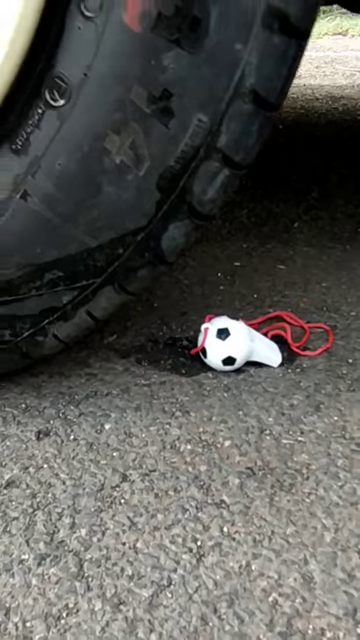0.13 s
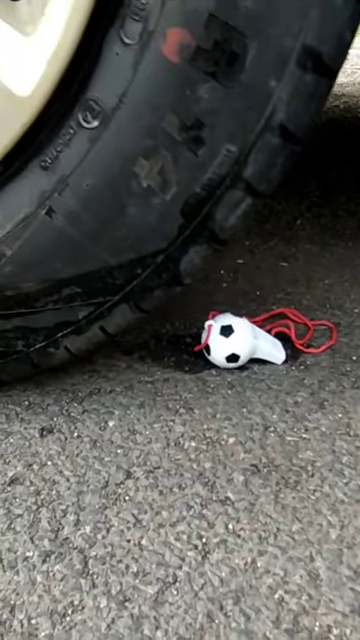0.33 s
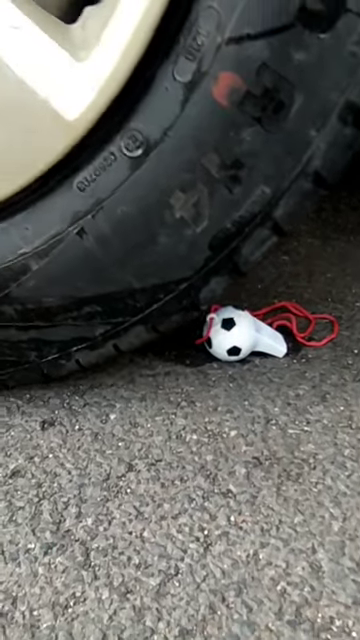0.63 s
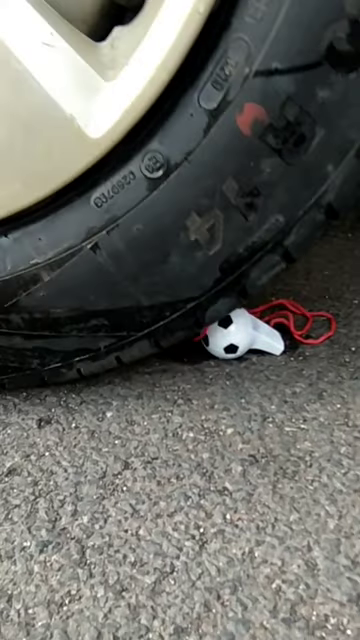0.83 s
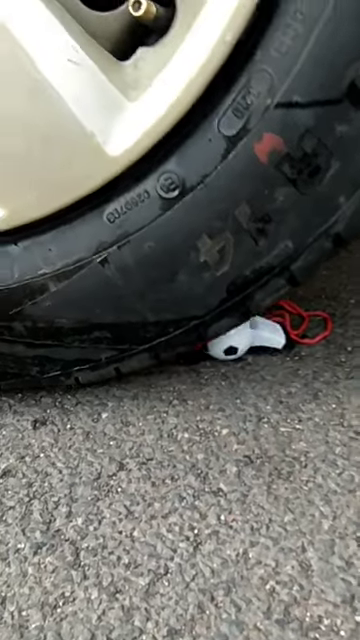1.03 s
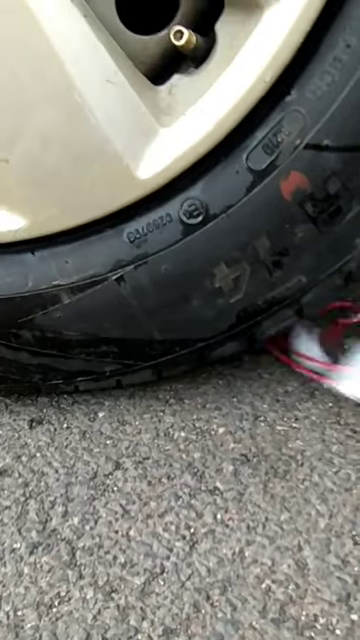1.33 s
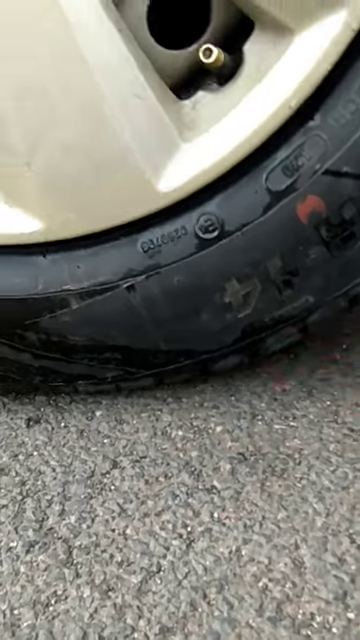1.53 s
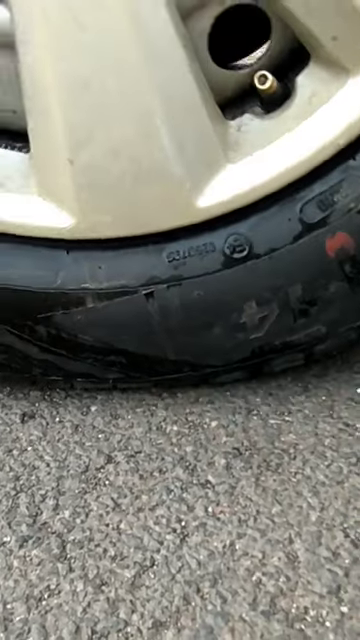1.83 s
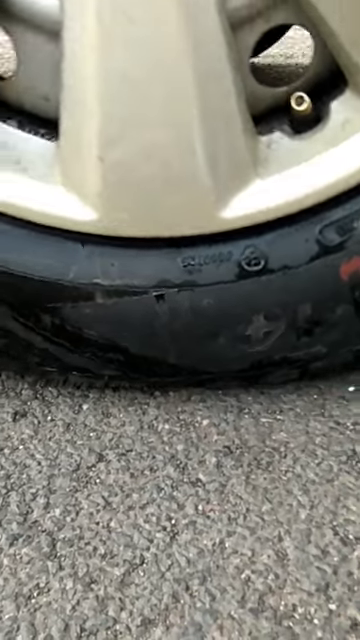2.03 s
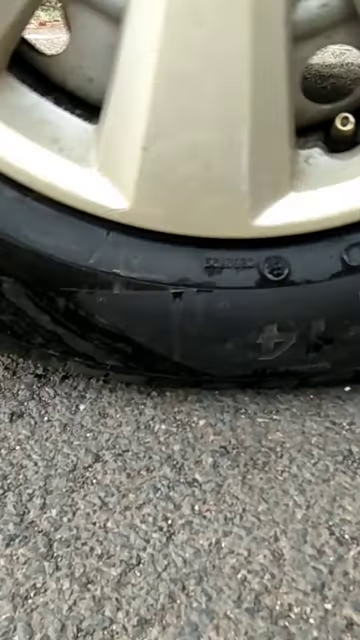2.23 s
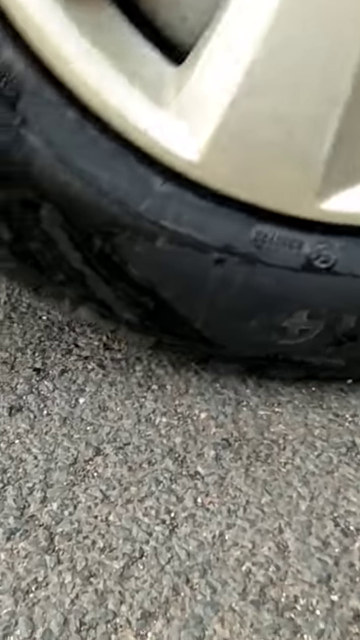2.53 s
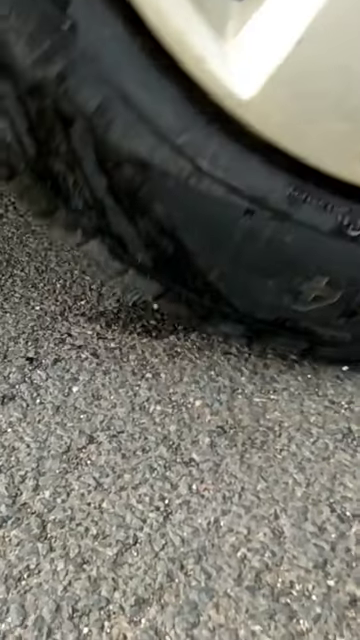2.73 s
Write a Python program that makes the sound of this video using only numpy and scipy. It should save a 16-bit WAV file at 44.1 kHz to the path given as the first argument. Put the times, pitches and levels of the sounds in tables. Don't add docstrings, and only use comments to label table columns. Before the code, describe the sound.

A hollow plastic toy cracks and splinters under a slow car tyre, engine idling beneath

```python
import sys
import numpy as np
from scipy import signal
from scipy.fft import rfft, irfft
from scipy.io import wavfile
from scipy.ndimage import uniform_filter1d, map_coordinates

SR = 44100
rng = np.random.default_rng(int(sys.argv[2]) if len(sys.argv) > 2 else 0)


def store_pcm(level_fs):
    pcm = np.round(np.clip(level_fs, -1, 1) * 32767).astype(np.int16)
    wavfile.write(sys.argv[1], SR, np.atleast_2d(pcm).T)


def rack_gain(trim_db):
    fader = np.asarray(trim_db, float)
    return 10 ** (fader / 20)


N = 127890
T = np.arange(N) / SR
BAND_HZ = 260 * 2 ** np.arange(0, 5.9, .2)

# (time [s], level [dB], frequency [Hz])
COLLAPSES = [
    (1.136, -18, 18),
    (1.241, -19.5, 7.6),
    (1.429, -17, 10.04),
]
# (time [s], level [dB], lag of left port [samples])
TYRE = [(0, -33, -10.5), (.2, -33, -12), (.4, -32, -6), (.6, -29.5, -3), (.7, -27, -2), (.9, -26, -3.5),
        (1.12, -24, 7), (1.35, -29, -4), (1.6, -29, 14), (1.9, -32, 13.5), (2.2, -36, 15.5),
        (2.5, -36.5, 15.5), (2.9, -37, 13)]


def level(x, db):
    return x * rack_gain(db) / np.sqrt(np.mean(x ** 2))


def curve(table, order):
    return np.interp(T, np.array(table)[:, 0], np.array(table)[:, order])


def colour(x, points, size=1024):
    p = np.array(points)
    log_hz = np.log(np.fft.rfftfreq(size, 1 / SR) + 1)
    log_gain = np.interp(log_hz, np.log(p[:, 0]), p[:, 1]) * np.log(10) / 20
    cepstrum = irfft(log_gain)
    cepstrum[1:size // 2] *= 2
    cepstrum[size // 2 + 1:] = 0
    h = irfft(np.exp(rfft(cepstrum)))
    return signal.fftconvolve(x, h / np.sqrt(np.sum(h ** 2)))[:len(x)]


def reso(x, hz, width_hz):
    return signal.lfilter(*signal.iirpeak(hz, hz / width_hz, SR), x)


def walk(rate):
    k = int(SR / rate)
    held = np.repeat(rng.standard_normal(N // k + 1), k)
    return 1.2 * uniform_filter1d(uniform_filter1d(held, k), k)[:N]


def grains(per_s, spread_db):
    chance, sign, size = rng.random((3, N))
    clicks = (chance < per_s / SR) * np.sign(sign - .5)
    return level(clicks * rack_gain(-spread_db * np.log(size + .04)), 0)


def smear(x, t60):
    tail = rng.standard_normal(8000) * rack_gain(-60 * T[:8000] / t60)
    return signal.fftconvolve(x, tail / np.sqrt(np.sum(tail ** 2)))[:N]


def shell():
    # (time [s], level [dB], hold [s], body boom [dB], cavity ring [dB])
    bursts = [
        (0.407, -54, 0.015, -31.5, -37),
        (1.1163, -28, 0.003, -57, -54),
        (1.1347, -15, 0.0064, -56, -50),
        (1.141, -27, 0.01, -38, -29),
        (1.224, -30.5, 0.0066, -37, -58),
        (1.2322, -15, 0.015, -33, -33.5),
        (1.247, -24, 0.043, -51, -25.5),
        (1.278, -19.5, 0.01, -31, -54),
        (1.4277, -16.5, 0.02, -26.5, -31.5),
        (1.435, -29, 0.0065, -24.5, -42),
    ]
    # (frequency [Hz], width [Hz], level [dB])
    body_modes = [(259, 170, -3.5), (690, 280, -5), (1340, 1200, -17)]
    # (frequency [Hz], level [dB per Hz])
    splinter_tone = [(200, -10), (1800, -6), (2600, -10), (3800, -11), (7200, -5), (9000, -1),
                     (12000, -18.5), (16200, -29)]
    burst_t60_s, sag_db_per_s = 0.071, 200
    snap_db, snap_s = 4, .0015
    cavity_hz, cavity_width_hz = 2460, 200
    splits = grains(1800, 4) + .6 * rng.standard_normal(N)
    push = 0
    for t0, db, hold, boom_db, ring_db in bursts:
        sag = -sag_db_per_s * np.clip(T - t0, 0, hold)
        decay = -60 * np.clip(T - t0 - hold, 0, None) / burst_t60_s
        snap = snap_db * np.exp(-np.abs(T - t0) / snap_s)
        shape = (T >= t0) * rack_gain(decay + sag + snap)
        push = push + rack_gain(np.array([[db], [boom_db], [ring_db]])) * shape * splits
    split_push, body_push, cavity_push = push
    body = sum(rack_gain(db) * reso(body_push, hz, w) * np.sqrt(SR / w) / 2 for hz, w, db in body_modes)
    cavity = reso(cavity_push, cavity_hz, cavity_width_hz) * np.sqrt(SR / cavity_width_hz) / 2
    return colour(split_push, splinter_tone) + body + cavity


def ticks():
    # (time [s], peak level [dB], frequency [Hz])
    snaps = [(1.1084, -20, 1210), (1.1089, -21, 9470), (1.1179, -19, 1770), (1.1196, -13, 10120),
             (1.1238, -20, 1810), (1.1355, -7, 9650), (1.1394, -8, 9170), (1.1414, -11, 1890),
             (1.1546, -17, 2110), (1.1587, -16, 8610), (1.168, -21, 1420), (1.2204, -18, 8570),
             (1.2344, -10, 2110), (1.2347, -5, 8570), (1.2493, -10, 2370), (1.2586, -14, 2410),
             (1.2653, -13, 9090), (1.2799, -13, 1460), (1.2799, -12, 9170), (1.2918, -17, 3010),
             (1.3477, -25, 9000), (1.3749, -21, 1850), (1.3796, -20, 1680), (1.4036, -19, 1890),
             (1.4088, -22, 9300), (1.4159, -21, 2760), (1.4302, -9, 9040), (1.431, -9, 2110),
             (1.4331, -12, 2760), (1.4346, -11, 9130), (1.4388, -13, 1680), (1.4411, -13, 1210),
             (1.4439, -13, 9220), (1.4979, -26, 10120), (1.5599, -6, 8870), (1.5787, -17, 2710),
             (1.5792, -13, 7360), (1.5813, -20, 1940), (1.5828, -11, 9350), (1.5856, -13, 7320),
             (1.5985, -22, 1640), (1.6045, -22, 1590), (1.613, -21, 8610), (1.6374, -18, 7150),
             (1.6585, -21, 1290), (1.6586, -18, 9040), (1.6959, -9, 9170), (1.6984, -19, 2540),
             (1.7125, -21, 2450), (1.725, -22, 2410), (1.7651, -6, 8790), (1.7657, -20, 2410),
             (1.8144, -15, 6160), (1.8151, -21, 2540), (1.9017, -18, 8700), (2.1896, -18, 8480)]
    trim_db, click_db, ring_cycles = -4.5, -10, 24
    out, d = np.zeros(N), T[:900]
    for (t0, db, hz), (turn, detune) in zip(snaps, rng.random((len(snaps), 2))):
        tone = np.sin(2 * np.pi * (hz * (1 + 0.047 * (detune - .5)) * d + turn / 2))
        ring = tone * rack_gain(-60 * d * hz / ring_cycles)
        click = rack_gain(click_db - 60 * d / 0.003) * rng.standard_normal(len(d))
        out[int(t0 * SR):][:len(d)] += rack_gain(db + trim_db) * (ring + click)
    return out


def shards():
    # (time [s], level [dB], crack t60
    # [s], ring frequency [Hz], ring level [dB])
    skips = [(1.242, -45, .02, 2480, -16), (1.255, -45, .02, 2440, -12), (1.237, -44, .02, 8500, -11),
             (1.139, -40, .02, 9250, -16), (1.525, -37, .03, 2580, -30), (1.5592, -17.5, 0.06, 8200, -33),
             (1.56, -34, .03, 5500, -34), (1.58, -38, 0.041, 3050, -24), (1.601, -46, .04, 4498, -34),
             (1.578, -22, 0.034, 7400, -14), (1.619, -44, 0.044, 3700, -42),
             (1.636, -28.5, 0.06, 9210, -26), (1.659, -24, 0.033, 2700, -43),
             (1.6905, -23, 0.053, 6000, -22), (1.694, -20, 0.043, 2710, -23),
             (1.6986, -42, .03, 4460, -14.5), (1.698, -45, 0.021, 6000, -32),
             (1.7641, -7.5, 0.03, 8550, -24), (1.767, -34, 0.019, 14400, -27),
             (1.814, -16, 0.021, 10580, -44.5), (1.82, -43, 0.025, 6080, -18.5),
             (1.817, -51, 0.036, 2517, -23), (1.9, -23.5, 0.033, 9105, -23.5),
             (1.946, -44, 0.031, 8860, -30), (2.178, -45, 0.027, 7400, -38),
             (2.188, -32.5, 0.069, 8970, -28)]
    # (frequency [Hz], level [dB per Hz])
    rattle_tone = [(1200, -20.5), (2500, -15), (3800, -7.5), (6200, 2), (9000, 7), (11500, -9),
                   (14000, -19), (16200, -15)]
    ring_t60_s, ring_rise_s = .036, 0.00063
    noise = rng.standard_normal(N) + 1.07 * grains(2800, 0.9)
    crack, ring = 0, 0
    for (t0, db, t60, hz, ring_db), turn in zip(skips, rng.random(len(skips))):
        d = np.clip(T - t0, 0, None)
        crack = crack + (d > 0) * rack_gain(db - 60 * d / t60)
        tone = np.sin(2 * np.pi * (hz * d + turn / 3)) * (1 - np.exp(-d / ring_rise_s))
        ring = ring + rack_gain(ring_db - 60 * d / ring_t60_s) * tone
    return colour(noise * crack, rattle_tone) + ring


def shoves():
    out = 0
    for t0, db, hz in COLLAPSES:
        cycles = np.clip(T - t0, 0, None) * hz
        out = out - rack_gain(db) * np.sin(2 * np.pi * cycles) * np.exp(-1.6 * cycles)
    return out


def engine():
    # (time [s], level [dB], firing rate [Hz])
    idle = [(0.25, -37, 25.17), (0.62, -33, 24.98), (0.67, -33, 25.63), (1.07, -26.5, 25.85),
            (1.15, -27, 26.18), (1.55, -29, 25.55), (2.0, -34, 25.71), (2.38, -36.5, 26.13),
            (2.74, -40.5, 25.93), (2.85, -38.5, 26.66)]
    # (frequency [Hz], width [Hz], level [dB])
    exhaust = [(28, 1.6, -64), (56, 8.7, -6.5), (125.2, 20, 2), (160.8, 15.2, -1), (178.9, 7.8, -0.5),
               (203.8, 4.5, -7), (228.3, 15.3, -10), (248.4, 60, -14)]
    # (frequency [Hz], width [Hz], level [dB])
    tailpipe = [(345, 80, -2), (680, 110, 0), (1050, 400, -3)]
    # (time [s], tailpipe over the boom [dB], tilt of the boom [dB per half octave])
    tail = [(0, -30, 12.5), (1.2, -33, 7.5), (1.6, -9, 7), (2.2, 0.5, 3.5), (2.9, 2.5, 3)]
    # (time [s], level over the boom [dB])
    sixth_order = [(0, -14), (1.5, -13), (1.9, -3.5), (2.35, -1), (2.9, -1)]
    jitter, scatter_db, first_turn = .006, 1.5, .3
    puff_share, puff_db, pipe_spread_s = .55, -3, .0075
    tail_puff_db, tail_scatter_db = 1, 4
    tail_nears_s, lead_s_per_s = 1.95, .019

    def ring(x, hz, width_hz, db):
        return rack_gain(db) * reso(x, hz, width_hz) / np.sqrt(width_hz)

    rate = curve(idle, order=2)
    turns = np.cumsum(rate * (1 + jitter * walk(13))) / SR + first_turn
    fired = level(np.diff(np.floor(turns), prepend=0) * rack_gain(scatter_db * walk(25.24)), 0)
    puff = level(np.exp(-(turns % 1) / puff_share) * rng.standard_normal(N), 0)

    hum = 0
    for k, (hz, width_hz, db) in enumerate(exhaust):
        blow = np.roll(fired, int(k * pipe_spread_s * SR)) + rack_gain(puff_db) * puff
        tilt = rack_gain(curve(tail, order=2) * np.clip(np.log2(hz / 165), -.3, .3) * 2)
        hum = hum + ring(blow, hz, width_hz, db) * tilt

    knock = 0
    for mode in tailpipe:
        uneven = (rack_gain(tail_puff_db) * puff - fired) * rack_gain(tail_scatter_db * walk(30.23))
        knock = knock + ring(uneven, *mode)
    lead = lead_s_per_s * np.clip(T - tail_nears_s, 0, None)
    knock = np.interp(T + lead, T, knock)
    phase = (turns + lead * rate) % 1

    rumble = signal.lfilter(*signal.butter(2, 45, fs=SR), rng.standard_normal(N))
    sixth = np.sin(2 * np.pi * 6 * turns) * rack_gain(curve(sixth_order, order=1))
    gain = rack_gain(curve(idle, order=1))
    pipe = level(hum, 1.0) + sixth + level(knock, 0) * rack_gain(curve(tail, order=1))
    return pipe * gain, level(rumble, -17) * gain, phase


def tread(phase, sway, flicker):
    # (frequency [Hz], level [dB per Hz])
    roll_tone = [(150, -25.5), (300, -13.5), (650, -4), (2500, -5.5), (3700, -15.5), (9200, -13),
                 (12300, -22), (15200, -26.5)]
    # (time [s], centre [Hz], level over the hiss [dB])
    scrubbing = [(0, 1750, -8), (.5, 1750, -6), (.64, 2090, 1.5), (.72, 2100, -12), (.82, 2447, -6),
                 (1.0, 2480, -25), (1.4, 2558, -11), (1.55, 2630, -5), (1.9, 2650, -10.5), (2.9, 2460, -18)]
    grit_db, cycle_depth_db = 3, 2
    raw = rng.standard_normal(N) + rack_gain(grit_db) * grains(2500, -1)
    raw = raw * rack_gain(cycle_depth_db * (.5 - phase) + sway)
    hiss = colour(raw, roll_tone)
    bands = sum(reso(hiss, hz, hz / 7) * g for hz, g in zip(BAND_HZ, flicker))
    narrow = signal.lfilter(*signal.butter(2, 200, fs=SR), raw)
    carrier = np.sin(2 * np.pi * np.cumsum(curve(scrubbing, order=1)) / SR)
    scrub = level(narrow, 0.91) * carrier * rack_gain(curve(scrubbing, order=2))
    return (level(bands, 0) + scrub) * rack_gain(curve(TYRE, order=1))


def air():
    n = signal.lfilter(*signal.butter(2, 30.8, fs=SR), rng.standard_normal((3, N)))
    return level(n[0] + .5 * n[1:], -48)


def ports(direct, own, lag, shared_db):
    diffuse_hz, bass_shared_db = 450, -1
    left = map_coordinates(direct, [np.arange(N) - lag], order=3, mode="nearest")
    shared = np.array([left, direct]) - own
    low = signal.lfilter(*signal.butter(1, diffuse_hz, fs=SR), shared)
    return low * (rack_gain(bass_shared_db) - rack_gain(shared_db)) + rack_gain(shared_db) * shared + own


def ducking():
    duck_db, attack_s, release_s = -8.5, 0.016, 0.06
    dip = 0
    for t0, _, _ in COLLAPSES:
        d = np.clip(T - t0, 0, None)
        dip = dip + (1 - np.exp(-d / attack_s)) * np.exp(-d / release_s)
    return rack_gain(duck_db * dip)


def scene():
    # (time [s], left over right [dB])
    balance = [(0, -0.5), (.55, -2), (.9, -2.5), (1.25, 2), (1.6, 0), (2.9, 1)]
    plastic = [shell() + shards() + ticks() for _ in range(3)]
    own = [x + rack_gain(-9) * smear(x, .06) for x in plastic[1:]]
    crushed = ports(plastic[0], np.array(own), -3, -9)

    pipe, rumble, phase = engine()
    sway = .8 * walk(5)
    flicker = [rack_gain((2.2 if hz < 3000 else 4) * walk(14)) for hz in BAND_HZ]
    own = [tread(phase, sway, flicker) + rack_gain(-5) * smear(pipe, 0.1) for _ in range(2)]
    car = ports(pipe + tread(phase, sway, flicker), np.array(own), curve(TYRE, order=2), -8)
    car = car + rumble * np.array([[1.6], [.4]])
    pan = rack_gain(curve(balance, order=1) * np.array([[.5], [-.5]]))
    return air() + car * pan * ducking() + crushed + shoves() * np.array([[.8], [1.2]])


def low_pass(x):
    return signal.sosfilt(signal.butter(12, 16500, fs=SR, output="sos"), x)


def record(dry):
    # (time [s], gain [dB])
    fade_in = [(0, -58), (.06, -31.5), (.112, -22), (.13, -8), (.15, -1.5), (.2, 3.5), (.3, 4)]
    # (frequency [Hz], level [dB])
    microphone = [(3000, 0.5), (4800, -0.5), (7300, -3.5), (8800, 1.5), (10300, 1.5), (12700, -3),
                  (14600, 3.5), (15600, 0.5)]
    soft = np.tanh(1.2 * dry * rack_gain(curve(fade_in, order=1))) / 1.2
    heard = np.array([colour(x, microphone) for x in soft])
    top_cut = signal.butter(12, 15300, fs=SR, output="sos")
    return low_pass(signal.sosfilt(top_cut, heard))


dry = scene()
out = record(dry)
store_pcm(out)
```